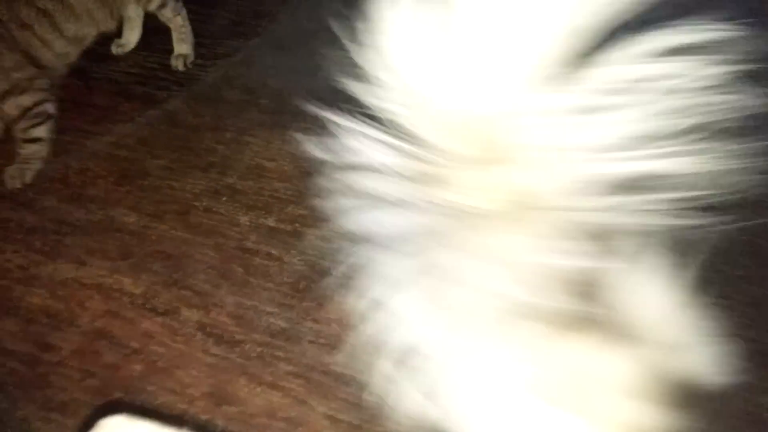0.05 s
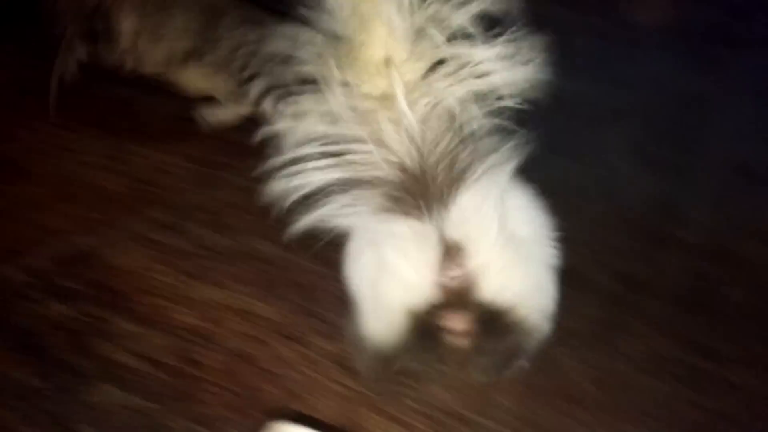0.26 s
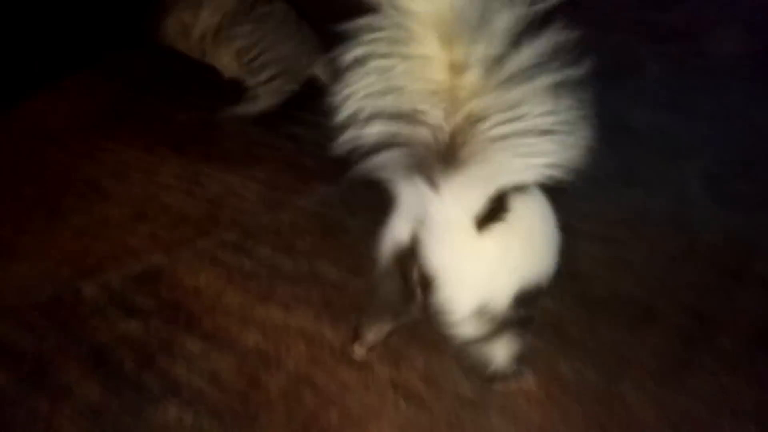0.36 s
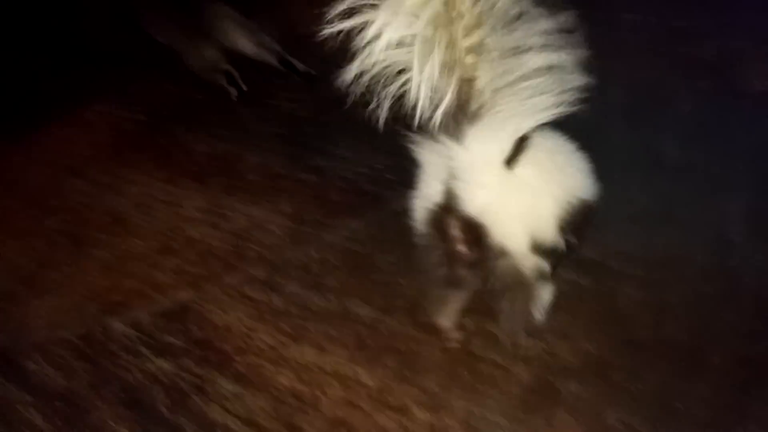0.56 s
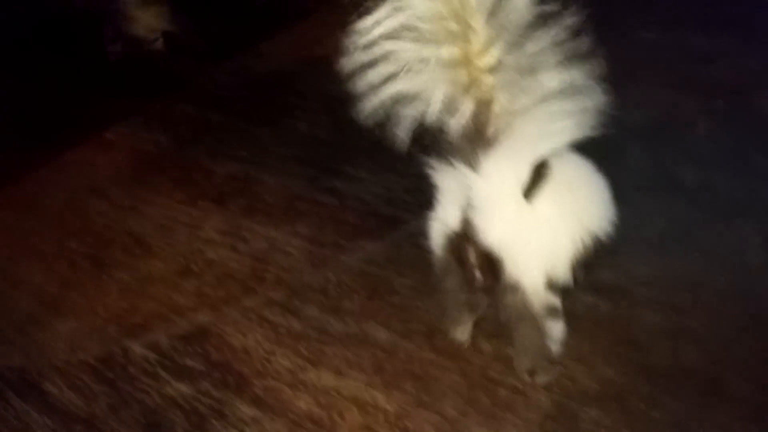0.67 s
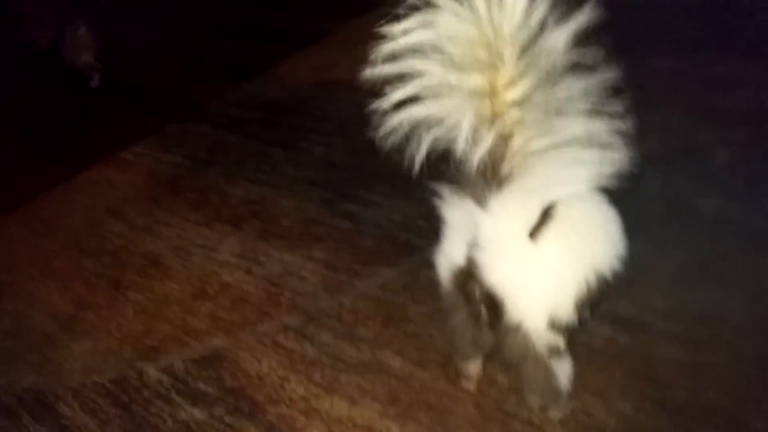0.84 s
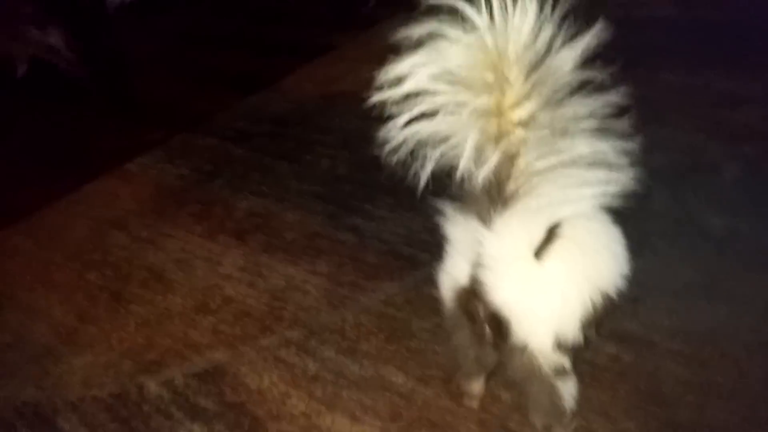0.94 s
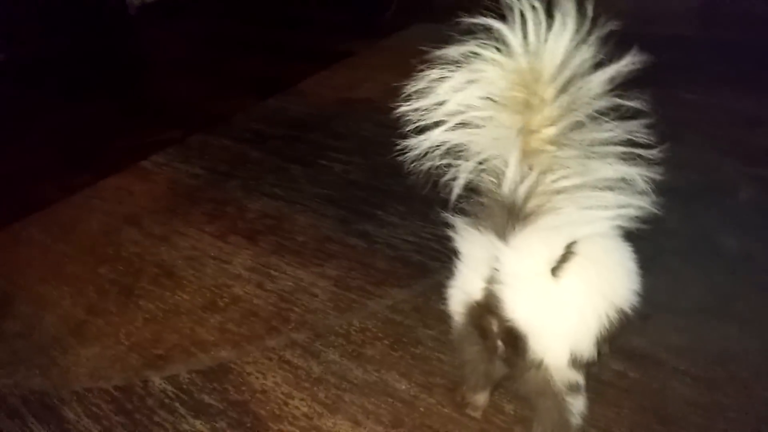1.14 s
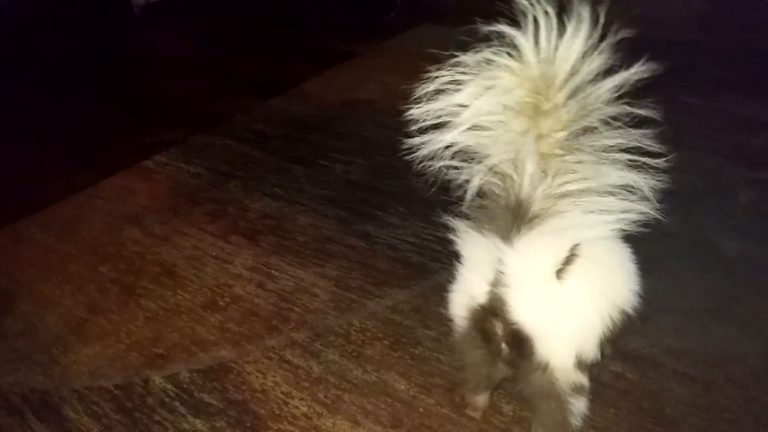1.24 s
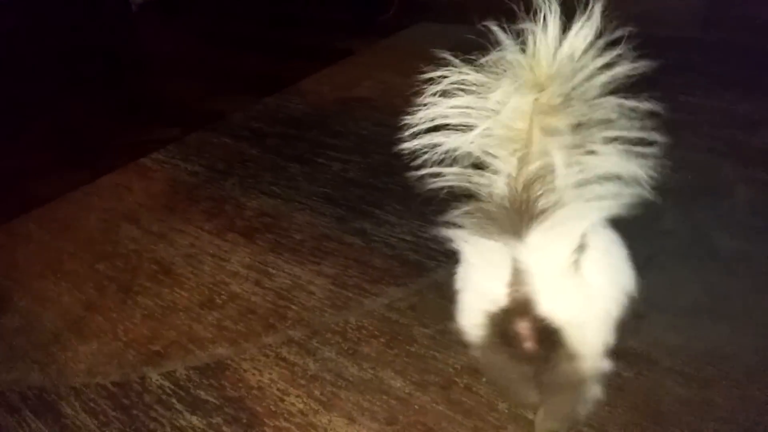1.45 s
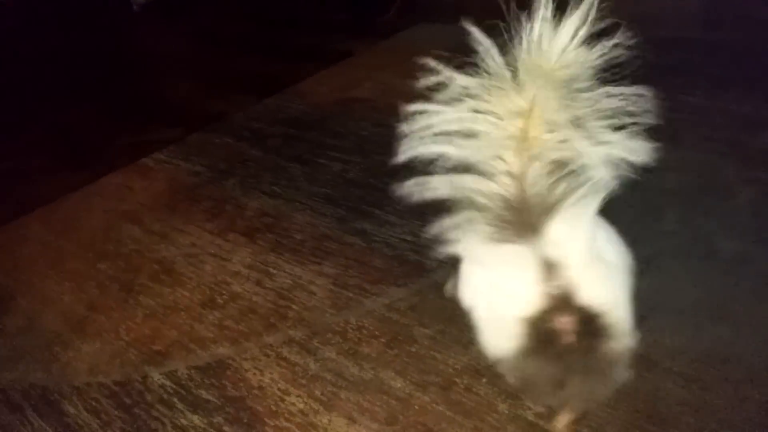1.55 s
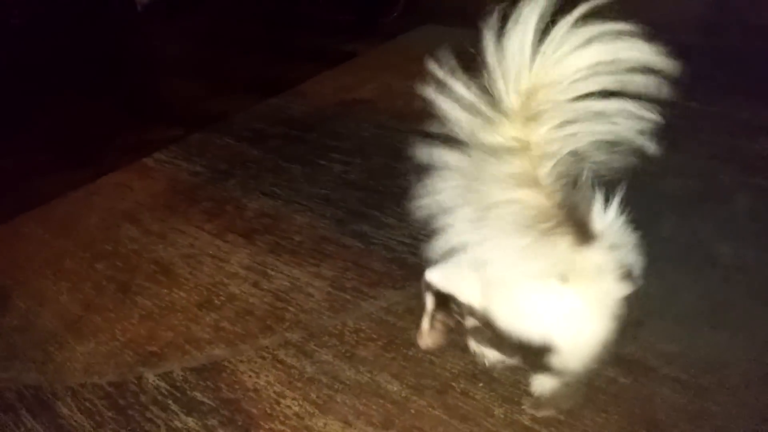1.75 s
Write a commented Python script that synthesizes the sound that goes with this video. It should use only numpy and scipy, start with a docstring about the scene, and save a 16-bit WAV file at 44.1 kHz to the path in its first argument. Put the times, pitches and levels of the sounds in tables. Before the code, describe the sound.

A skunk stamps its front paws on a wooden floor at about 0.2 and 0.5 seconds, two sharp, close slaps with a low thump, ringing briefly in a bare room. Claws skid faintly after each. A lighter pat comes near 0.7 seconds, then soft shuffling steps, a light tap at 1.3 seconds and faint scuffs until about 1.8. Quiet room noise and a faint appliance hum lie underneath.

```python
"""Two sharp stamps, close by, ring out in a bare room: a skunk's front paws on a wooden floor.
Each is a slap of the boards over a low, damped thump, and the claws skid after it with a grainy rasp.
The skunk then shuffles back with soft steps that flex the floor, and a light tap.
An appliance hums under the quiet room noise."""
import sys
import numpy as np
from scipy import signal
from scipy.fft import rfft, irfft, next_fast_len
from scipy.io import wavfile
from scipy.ndimage import map_coordinates

SR = 44100
rng = np.random.default_rng(int(sys.argv[2]) if len(sys.argv) > 2 else 0)


def to_wav(sig):
    """Store sig (one row per channel, or 1-D mono) as 16-bit WAV at the path in sys.argv[1].

    Samples outside -1..1 are clipped; the rate is SR.
    """
    pcm = np.clip(np.atleast_2d(sig), -1, 1) * 32767
    pcm = np.round(pcm).astype(np.int16)
    wavfile.write(sys.argv[1], SR, pcm.T)  # frames by channels


N = 79380

# Paw hits, two hard then two light; direct_treble_db shelves only the dry sound:
# start_s, slap_db, thump_db, thump_hz, brightness_hz, direct_treble_db, room_send_db
PAW_HITS = [(0.2440, 12.5, -14, 181.4, 7500, -1.5, 1), (0.4894, 12, -20.5, 213, 4470, -4.5, 2),
            (0.6636, -8.5, -43.5, 190, 2040, -19, 5), (1.3301, -12, -36.5, 450, 614, 32, 6.5)]
# Tone of the boards under a paw: frequency_hz, gain_db
BOARD_TONE = [(50, -42), (110, 2), (220, 2.5), (320, 7), (430, -0.5), (700, 1.5), (1100, 2.5), (1350, 1),
              (1650, 1), (2050, -10), (3500, -16), (5000, -20.5), (7500, -31.5), (16000, -39)]
# Stereo image of pads and toes settling: frequency_hz, correlation
PATTER_IMAGE = [(500, 0.91), (1000, 1), (2000, 0)]
# Claws and fur sliding on wood, the shortest mere ticks: start_s, length_s, rasp_db, fizz_db
SKID_STROKES = [(0, 0.36, -70, -84), (0.043, 0.011, -62, -82), (0.254, 0.025, -43, -51),
                (0.273, 0.037, -57, -79), (0.308, 0.06, -47, -55), (0.492, 0.031, -41.5, -53.5),
                (.525, 0.039, -54.5, -78), (0.654, 0.06, -54.5, -68), (0.796, 0.075, -56, -73),
                (0.972, 0.18, -63.5, -81), (1.054, 0.0077, -65, -79), (1.121, .01, -64, -80),
                (1.315, 0.055, -60, -71), (1.384, 0.069, -59, -79), (1.45, 0.21, -72, -80.5),
                (1.624, 0.23, -62.5, -72.5)]
# Midrange rasp of pads and fur: frequency_hz, gain_db
RASP_TONE = [(500, -22), (1000, 1), (1600, 3), (2000, 0.5), (3000, -1.5), (5000, -4.5), (8000, -19),
             (15000, -37)]
# Top-end fizz of the claws: frequency_hz, gain_db
FIZZ_TONE = [(4000, -1), (8000, -11.5), (11000, 0), (15500, -10)]
# Footfalls that only flex the floor: start_s, level_db, pitch_hz, length_s
SOFT_STEPS = [(.163, -47, 120, 0.019), (.222, -63, 172, .016), (.405, -43.5, 109, 0.025),
              (.44, -44, 216, 0.065), (.69, -52, 160, .05), (.815, -52, 80, 0.065),
              (.905, -50.5, 200, 0.023), (.925, -61, 84, 0.054), (.975, -49.5, 244.5, 0.04),
              (.987, -41.5, 136, 0.023), (1.012, -48, 84, 0.039), (1.052, -46, 182, 0.015),
              (1.06, -47.5, 99, 0.08), (1.086, -57, 230, .016), (1.13, -52, 106, 0.029),
              (1.27, -57.5, 93, 0.035), (1.64, -57, 123.5, 0.053)]
# Time the reverb takes to fall 60 dB: frequency_hz, decay_s
REVERB_DECAY = [(80, 0.52), (210, 0.39), (560, 0.68), (1500, 0.63), (4000, 0.66), (11000, 0.57)]
# Colour of the reverb: frequency_hz, gain_db
REVERB_TONE = [(60, 0), (85, -1.5), (150, -8), (220, -1.5), (420, -4), (750, 1), (1100, -1.5), (1600, -0.5),
               (2600, 3.5), (5000, 1), (12000, 3.5)]
# Stereo image of the reverb: frequency_hz, correlation
REVERB_IMAGE = [(150, 1), (300, .92), (550, 0.75), (1000, 0.59), (2000, -0.32), (5000, 0.052)]
# Partials of the appliance hum: pitch_hz, level_db
HUM_PARTIALS = [(263.8, -69), (437, -76.5), (527.6, -75.5), (790.5, -70.5)]
# Colour of the quiet room noise: frequency_hz, gain_db
AIR_TONE = [(25, -30), (45, -14), (80, -4.5), (190, -4.5), (265, -4), (340, -10), (520, -9), (700, -10.5),
            (1000, -11.5), (1550, -5.5), (1950, -16.5), (3000, -17), (4500, -22), (7500, -32), (10000, -32),
            (13000, -29.5), (15500, -32.5)]
# Stereo image of the room noise and the skids: frequency_hz, correlation
NOISE_IMAGE = [(100, 0.93), (400, 0.7), (1000, 0.3), (2000, 0.065), (8000, 0.15)]
# Balance of the whole mix: frequency_hz, left_minus_right_db
BALANCE = [(100, -1.5), (450, 1.5), (1100, -3.5), (2000, -2.5), (4000, -1.5), (8000, -0.5), (12000, 2)]


def stamps(flam_s=0.001201, patter_t60_s=0.023, thump_peak_cycles=0.51, shelf_hz=2180, left_lead_s=0.0001):
    """Two paws slap down almost together and the floor gives one low, heavily damped thump."""
    out, t = np.zeros((2, N)), np.arange(SR // 5) / SR
    paws = np.zeros((1, len(t)))
    paws[0, 0], paws[0, round(flam_s * SR)] = amp(-18.5), 1  # the lighter paw lands first
    settle = amp(-60 * np.maximum(t - flam_s, 0) / patter_t60_s) * (t > flam_s)
    nearer_left = lambda f: np.exp(1j * np.pi * f * left_lead_s * np.array([[1], [-1]]))
    for start_s, slap_db, thump_db, thump_hz, bright_hz, treble_db, send_db in PAW_HITS:
        patter = pair(len(t), PATTER_IMAGE) * settle  # pads and toes settling
        patter *= amp(0.5) / np.sqrt(np.sum(patter ** 2) / 2)
        boards = amp(slap_db) * causal(lambda f: amp(along(BOARD_TONE, f)) / (1 + (f / bright_hz) ** 2))
        ring = lambda force: signal.fftconvolve(force, boards[None], axes=1)[:, :len(t)]
        age = t * thump_hz / thump_peak_cycles  # 1 where the floor flexes most
        thump = (age * np.exp(1 - age)) ** 2 * np.sin(2 * np.pi * thump_hz * t)
        blow = ring(paws) + amp(thump_db) * thump
        # The body shades the dry treble; on the last tap the shelf lifts it instead.
        shelf = causal(lambda f: amp(treble_db * (1 - 1 / (1 + (f / shelf_hz) ** 8))))
        direct = signal.fftconvolve(blow + ring(patter), shelf[None], axes=1)
        add(out, start_s - flam_s, filtered(direct, nearer_left))
        add(out, start_s - flam_s, amp(send_db) * reverb(blow))
    return out


def skids(grain_db=5.5, send_db=-2.5):
    """Grainy friction on wood: a rasp of pads and fur, and a fine fizz from the claws."""
    t = np.arange(N) / SR
    rasp = sum(amp(db) * swell(t - start_s, length_s) for start_s, length_s, db, _ in SKID_STROKES)
    fizz = sum(amp(db) * swell(t - start_s, length_s) for start_s, length_s, _, db in SKID_STROKES)
    grain = unit(amp(grain_db * wobble(rate_hz=450)))
    slide = grain * (rasp * noise(RASP_TONE) + fizz * noise(FIZZ_TONE))
    return slide + amp(send_db) * reverb(slide)


def steps(scuff_hz=600, scuff_db=-10.5, send_db=1.5):
    """Weight shifts from paw to paw: a few low cycles of the floor with a dull scuff on top."""
    out, t = np.zeros((2, N)), np.arange(SR // 5) / SR
    for start_s, level_db, pitch_hz, length_s in SOFT_STEPS:
        scuff = unit(filtered(rng.standard_normal(len(t)), lambda f: 1 / (1 + (f / scuff_hz) ** 4)))
        flex = np.sin(2 * np.pi * pitch_hz * t)
        step = amp(level_db) * swell(t, length_s) ** 2 * (flex + amp(scuff_db) * scuff)
        add(out, start_s, step)
        add(out, start_s, amp(send_db) * reverb(step))
    return out


def reverb(x, wall_s=0.015, scatter_db=-10, early_db=2, early_s=0.018):
    """The bare room: thin scatter, strong first wall reflections, then a wash dying band by band."""
    hz, t, bands = signal.stft(pair(SR, REVERB_IMAGE), SR, nperseg=256)
    decay = amp(-60 * t / along(REVERB_DECAY, hz)[:, None])
    tail = signal.istft(bands * decay, SR, nperseg=256)[1]
    since_wall = np.arange(tail.shape[1]) / SR - wall_s
    tail *= amp(np.where(since_wall < 0, scatter_db, early_db * np.exp(-since_wall / early_s)))
    tail /= np.sqrt(np.sum(tail ** 2) / 2)
    colour = causal(lambda f: amp(along(REVERB_TONE, f)))
    tail = signal.fftconvolve(tail, colour[None], axes=1)
    return signal.fftconvolve(np.atleast_2d(x), tail, axes=1)[:, :N]


def appliance_hum(waver_rad=0.73):
    """An appliance drones on a few partials, each wavering slightly."""
    t = np.arange(N) / SR
    return sum(amp(db) * np.sqrt(2) * np.sin(2 * np.pi * hz * t + waver_rad * wobble(rate_hz=12.28))
               for hz, db in HUM_PARTIALS)


def room_noise(level_db=-57.5):
    """A steady, dark bed of air."""
    return amp(level_db) * noise(AIR_TONE)


def amp(db):
    """Decibels to gain."""
    return 10 ** (np.asarray(db) / 20)


def unit(x):
    """Scale to rms 1."""
    return x / np.sqrt(np.mean(x ** 2) + 1e-20)


def along(points, hz):
    """Read a curve of (frequency_hz, value) points on a log axis."""
    frequencies, values = np.transpose(points)
    return np.interp(np.log(hz + 1), np.log(frequencies + 1), values)


def filtered(x, response):
    """Shape x with a frequency response."""
    n = x.shape[-1]
    size = next_fast_len(n + SR // 2)
    return irfft(rfft(x, size) * response(np.fft.rfftfreq(size, 1 / SR)), size)[..., :n]


def causal(gain, size=4096):
    """The tightest (minimum-phase) impulse response with the given gain curve."""
    magnitude = np.maximum(gain(np.fft.rfftfreq(size, 1 / SR)), 1e-6)
    cepstrum = irfft(np.log(magnitude))
    cepstrum[1:size // 2] *= 2
    cepstrum[size // 2 + 1:] = 0
    return irfft(np.exp(rfft(cepstrum)))


def pair(n, image):
    """White stereo noise whose left-right correlation follows the image curve."""
    width = lambda hz: np.arccos(np.clip(along(image, hz), -1, 1)) / 2
    white = rng.standard_normal((2, n))
    mid, side = filtered(white, lambda hz: np.array([np.cos(width(hz)), np.sin(width(hz))]))
    return np.array([mid + side, mid - side])


def noise(tone):
    """Coloured stereo noise of rms 1."""
    return unit(filtered(pair(N, NOISE_IMAGE), lambda hz: amp(along(tone, hz))))


def wobble(rate_hz):
    """A smooth random modulator."""
    knots = rng.standard_normal(int(N * rate_hz / SR) + 4)
    return map_coordinates(knots, [np.arange(N) * rate_hz / SR])


def swell(t, length_s):
    """A half-sine envelope."""
    return np.sin(np.pi * np.clip(t / length_s, 0, 1))


def add(out, start_s, x):
    """Mix x in at its cue."""
    part = out[:, max(round(start_s * SR), 0):][:, :x.shape[-1]]
    part += x[..., :part.shape[-1]]


def scene():
    """The skunk over the room's bed, coloured a little differently left and right."""
    mix = stamps() + steps() + skids() + appliance_hum() + room_noise()
    return filtered(mix, lambda hz: amp(np.array([[.5], [-.5]]) * along(BALANCE, hz)))


def record(dry, low_cut_hz=72, top_hz=15800):
    """Master EQ: thin the deep bass and cut off the very top."""
    thinned = signal.sosfilt(signal.butter(3, low_cut_hz, "high", fs=SR, output="sos"), dry)
    return filtered(thinned, lambda hz: hz < top_hz)


dry = scene()
out = record(dry)
to_wav(out)
```